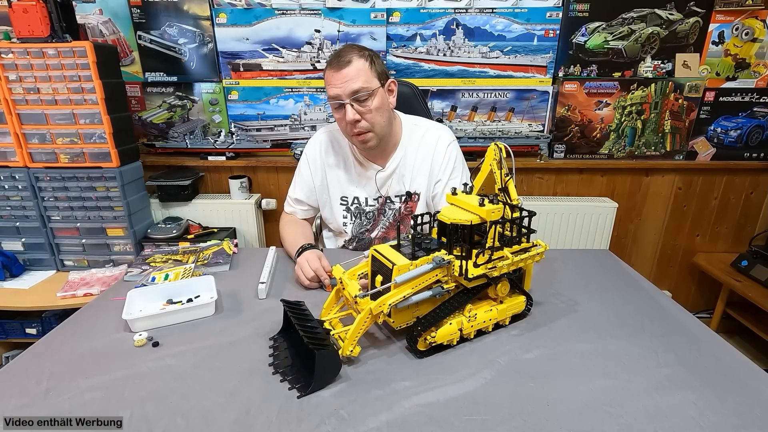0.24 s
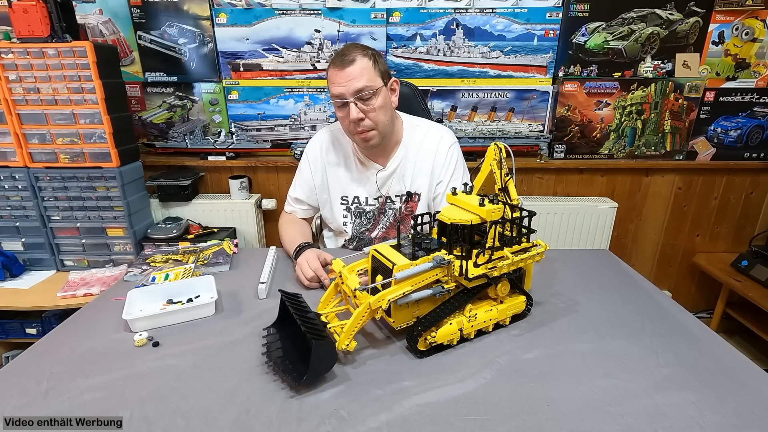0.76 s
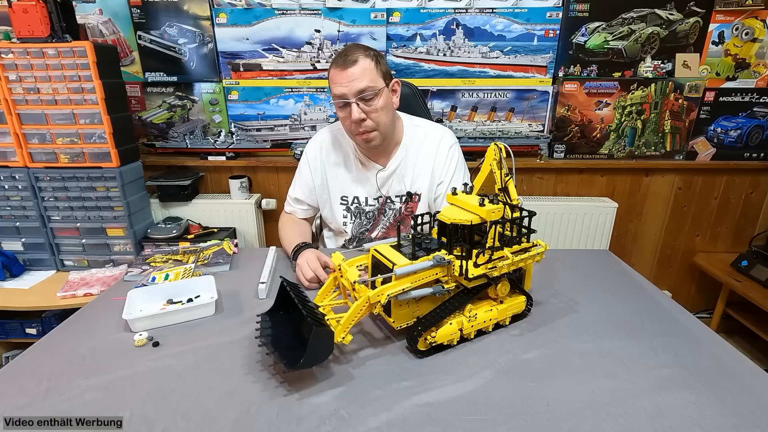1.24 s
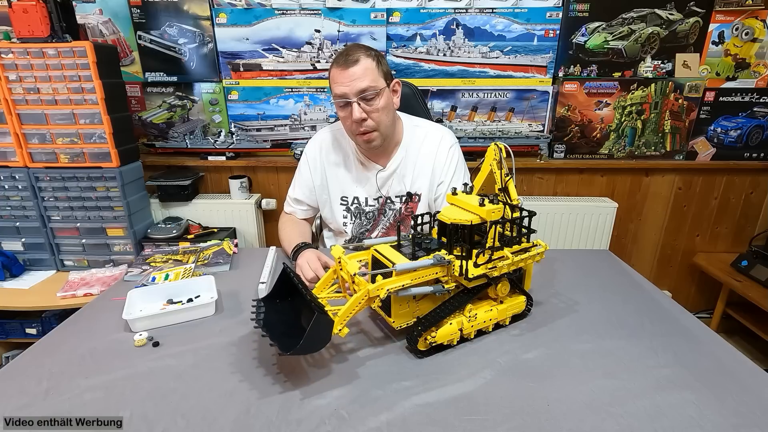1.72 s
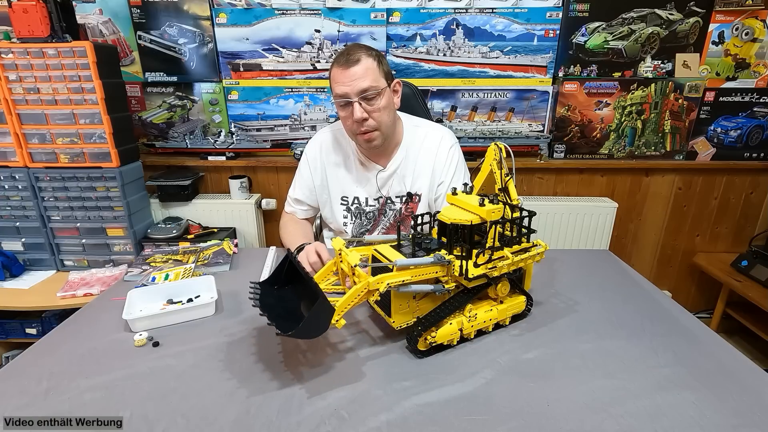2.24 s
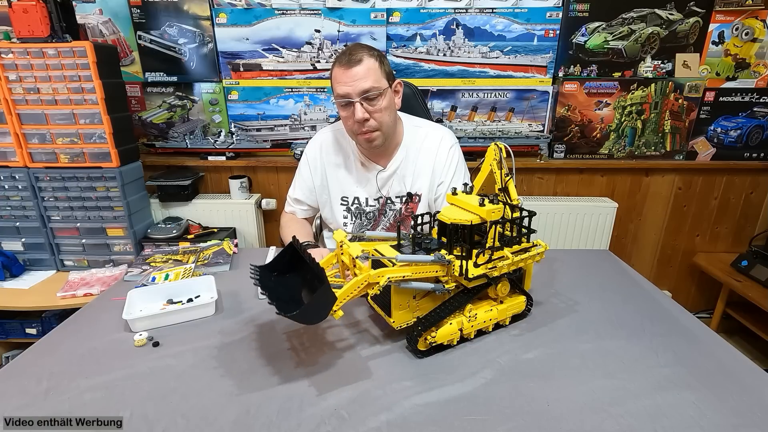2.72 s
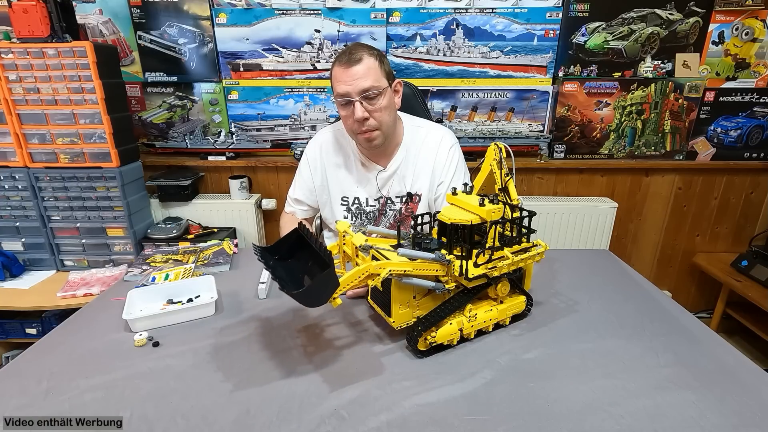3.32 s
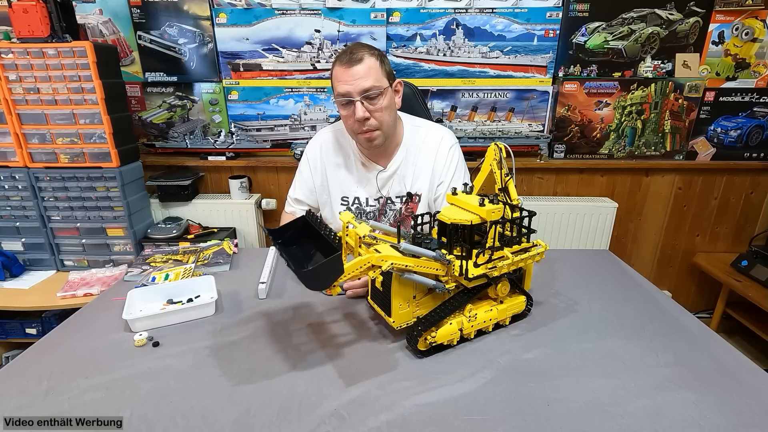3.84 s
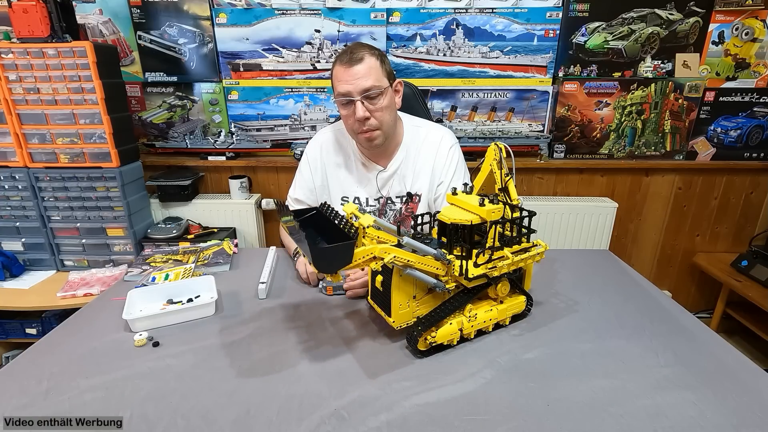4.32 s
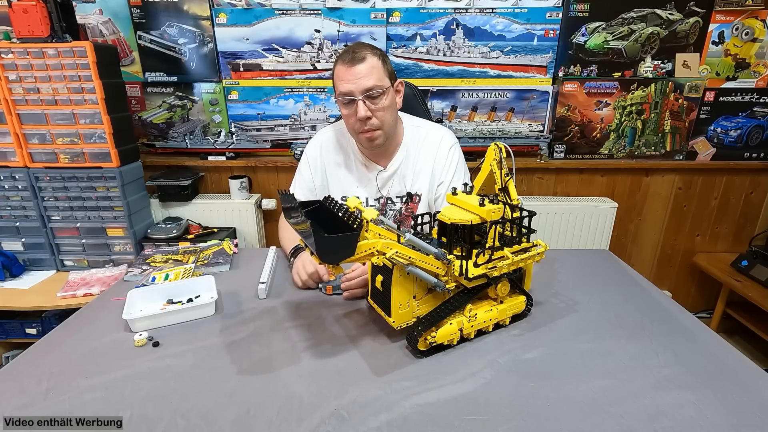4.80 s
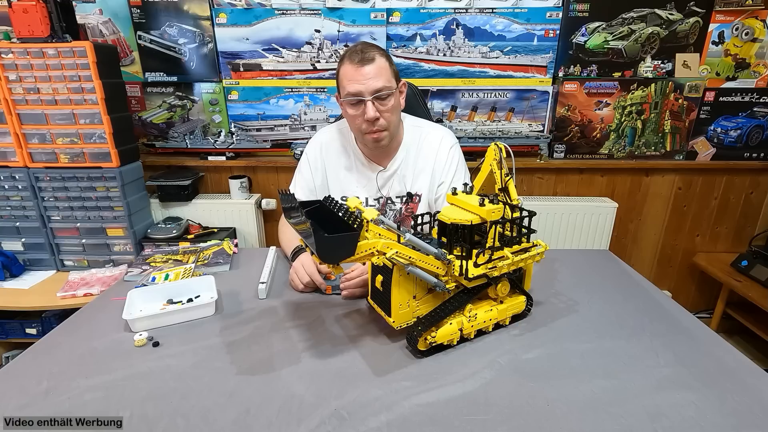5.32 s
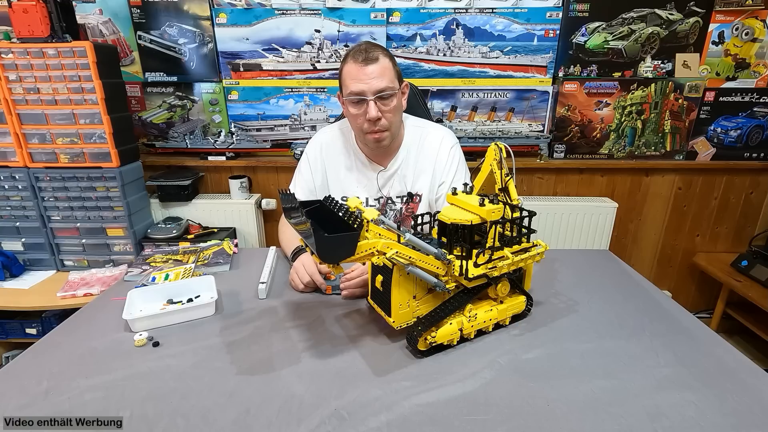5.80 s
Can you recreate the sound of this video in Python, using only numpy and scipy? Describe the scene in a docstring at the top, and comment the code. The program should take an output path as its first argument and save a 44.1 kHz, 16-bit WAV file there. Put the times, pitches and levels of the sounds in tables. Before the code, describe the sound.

Heard close in a small room, a plastic toy bulldozer lifts its bucket with a thin motor whine and whirring gears. Twice the load makes the frame rattle and the gear teeth skip in loud, quick clicks, with softer ticking in between. The gears then rasp until the power cuts. With a sharp clack the motor restarts and hums freely, with one short axle squeak near the end.

```python
"""A plastic toy bulldozer's electric motor buzzes as it lifts the bucket, on a table in a small room.
Brushes scrape inside the motor, gears whirr, and the output gear ticks once a turn.
Twice the gears strain hard, rattle the frame and skip teeth loudly.
The motor runs down, a gear selector clacks over, and the motor spins up again with no load."""
import sys
import numpy as np
from scipy import signal
from scipy.fft import rfft, irfft
from scipy.io import wavfile

SR = 44100
rng = np.random.default_rng(int(sys.argv[2]) if len(sys.argv) > 2 else 0)


def store_pcm(level_fs):
    """Save levels as 16-bit WAV."""
    pcm = np.round(np.clip(level_fs, -1, 1) * 32767).astype(np.int16)
    wavfile.write(sys.argv[1], SR, np.atleast_2d(pcm).T)


N = 267157
TIME = np.arange(N) / SR
CUT_S, RESTART_S = 4.71, 4.96  # the power goes off, then on again

# tone of the plastic frame: (frequency [Hz], level [dB])
FRAME_TONE = [(90, -5), (170, 0.5), (290, 6.5), (520, -2.5), (1000, -2), (1550, 2), (2400, -3.5),
              (3100, -1.5), (4150, -9), (5300, -1), (7000, -1.5), (9500, -11.5), (12500, -12.5),
              (15800, -11.5)]
# tone of the shaken tabletop: (frequency [Hz], level [dB])
TABLETOP_TONE = [(20, -9.5), (42, 1.5), (58, -1), (76, -11), (102, 4.5), (140, 2.5), (195, -16), (400, -11),
                 (1000, -66.5)]


def amp(db):
    """Turns decibels into a gain."""
    return 10 ** (np.asarray(db) / 20)


def unit(x):
    """Scales a signal to an average (rms) size of 1."""
    return x / np.sqrt(np.mean(x ** 2) + 1e-20)


def read(points, hz):
    """Reads a curve between its points on a log-frequency axis."""
    f, value = np.transpose(points)
    return np.interp(np.log(hz + 1), np.log(f + 1), value)


def add(mix, s, sound):
    """Mixes a sound in at s seconds."""
    part = mix[max(round(s * SR), 0):][:len(sound)]
    part += sound[:len(part)]


def colour(x, spectrum, peaks=(), size=8192):
    """Filters a sound with a broad tone curve plus narrow peaks or dips."""
    hz = abs(np.fft.fftfreq(size, 1 / SR))
    db = read(spectrum, hz) + sum(d / (1 + (2 * (hz - f) / w) ** 2) for f, w, d in peaks)
    log_gain = np.log(amp(np.maximum(db, -100)))
    response = np.exp(np.conj(signal.hilbert(log_gain)))  # rings only after a hit
    ring = np.fft.ifft(response).real[:size // 2]
    return signal.oaconvolve(x, ring / np.linalg.norm(ring))[:N]


def wander(hz):
    """Random drift, mostly slower than hz."""
    rolloff = 1 + (np.fft.rfftfreq(N, 1 / SR) / hz) ** 4
    return unit(irfft(rfft(rng.standard_normal(N)) / rolloff, N))


def grit(spread_db):
    """Noise like tiny hits of uneven size."""
    return unit(rng.standard_normal(N) * amp(spread_db * wander(2240)))


def each_turn(turns, size=2048, count=130, order=16):
    """A rough surface comes round on every turn and makes a bright buzz."""
    k = np.arange(count)
    surface = irfft(np.exp(2j * np.pi * rng.random(count)) * k ** 2 / (k ** 2 + order ** 2), size)
    return unit(np.interp(turns % 1, np.arange(size) / size, surface, period=1))


def beat(turns, depth):
    """A push that peaks once a cycle."""
    return unit(np.exp(depth * np.cos(2 * np.pi * turns)))


def spells(rows, rise_s, fall_s):
    """Gain over time: each (start [s], end [s], level [dB]) row rises, holds and dies away."""
    return sum(amp(db) * np.clip((TIME - start) / rise_s, 0, 1)
               * np.exp(-np.maximum(TIME - end, 0) / fall_s) for start, end, db in rows)


def spin(coast_s=.25, spin_up_s=.125):
    """Share of full speed: it falls ever faster after the cut and swings back up at the restart."""
    coast = 1 - np.clip((TIME - CUT_S) / coast_s, 0, 1) ** 1.35
    restart = np.sin(np.pi / 2 * np.clip((TIME - RESTART_S) / spin_up_s, 0, 1))
    return np.maximum(coast, restart)


def motor_gain():
    """The motor is quieter the slower it turns."""
    # loudness at full speed: (time [s], level [dB])
    levels = [(0, -49.5), (.55, -49), (.75, -58.5), (2.5, -56.5), (2.7, -52.5), (3.85, -53.5), (4.0, -50.5),
              (6.06, -50)]
    return amp(np.interp(TIME, *np.transpose(levels))) * spin() ** 1.55


def motor(turns, db=13, hiss_db=-2):
    """Brushes scrape the same spinning contacts on every turn, and the bearings add a duller hiss."""
    # tone of the motor: (frequency [Hz], level [dB])
    tone = [(40, 1), (80, -3), (150, 2.5), (420, -4), (800, -1.5), (1150, -6), (1600, 0), (2400, -6),
            (3200, -3.5), (4050, -11.5), (4600, -2.5), (7200, -2), (8900, -2), (11200, 0), (11900, -12),
            (14500, -8), (15800, -7)]
    # its case rings: (frequency [Hz], width [Hz], boost [dB])
    case = [(4820, 120, 3), (7900, 95, 10), (8260, 180, 11.5), (10300, 350, 2.5)]
    hiss = signal.lfilter(*signal.butter(1, 5000, fs=SR), grit(0.89))
    scrape = each_turn(turns) + amp(hiss_db) * unit(hiss)
    scrape = unit(scrape * beat(3 * turns, 0.45) * beat(2 * turns, 0.034))
    return amp(db) * motor_gain() * colour(scrape, tone, case)


def whine(turns, flutter_db=3, waver=0.94, worn_db=-0.5):
    """Meeting teeth make thin tones; a worn gear wavers, and one gear runs on as the motor coasts."""
    # gear tones: (pitch [times motor speed], level [dB])
    pitches = [(9, -6), (10, -7), (17.66, -12), (35, -9), (43, -7), (44, -4), (46, -5), (47, -5), (59, -8)]
    tones = sum(amp(db + flutter_db * wander(25)) * np.sin(2 * np.pi * k * turns) for k, db in pitches)
    worn = np.sin(2 * np.pi * 26.25 * turns + waver * wander(60)) * amp(flutter_db * wander(32))
    worn *= amp(worn_db) * spin() ** 7.3  # sings only near full speed
    overrun = np.sin(2 * np.pi * 33 * turns + waver * wander(60))
    coasting = spells([(CUT_S, CUT_S + 0.052, -45)], rise_s=.03, fall_s=0.026)
    return motor_gain() * (tones + worn) + coasting * overrun


def hum(turns, pulse_hz=2017):
    """The off-balance rotor hums, and the speed controller's pulses make the coils sing."""
    # hum at one, two and three times the motor speed: (level [dB])
    levels = [-55, -50.5, -60]
    # the motor runs free: (start [s], end [s], level [dB])
    free_runs = [(0, .2, -16), (5.02, 6.06, 0)]
    # the coils sing at part power: (start [s], end [s], level [dB])
    singing = [(3.92, 4.72, -52), (4.923, 4.94, -42), (4.952, 4.964, -44)]
    rotor = sum(amp(db) * np.sin(2 * np.pi * k * turns) for k, db in enumerate(levels, 1))
    rotor *= spells(free_runs, rise_s=.05, fall_s=.05)
    phase = 2 * np.pi * pulse_hz * TIME
    coils = np.sin(phase) + amp(-37) * np.sin(2 * phase)
    coils *= spells(singing, rise_s=.003, fall_s=0.005)
    return np.sqrt(2) * (rotor + coils)


def room_tone(db=-54):
    """The still room's faint rumble and hiss."""
    # tone of the room: (frequency [Hz], level [dB])
    tone = [(20, -29), (60, -21), (150, -7), (400, -3), (2000, -8.5), (9000, -12.5), (16000, -23)]
    return amp(db) * colour(rng.standard_normal(N), tone)


def gears(turns, db=5.5, table_db=-8):
    """Rubbing gear teeth whirr and shake the table."""
    # tone of the gears: (frequency [Hz], level [dB])
    tone = [(200, -6), (480, -10.5), (750, -4.5), (1200, -9.5), (1700, 0.5), (2200, -7.5), (3000, -11),
            (4200, -17.5), (5100, -6), (5700, -14.5), (6500, 3), (7400, -13), (9000, -21), (9800, -8),
            (10900, -33), (12100, -17.5), (15800, -19)]
    # their case rings: (frequency [Hz], width [Hz], boost [dB])
    case = [(1726, 134, 5.7), (6730, 180, 4.15), (5960, 250, 4.8)]
    # the gears are engaged: (start [s], end [s], level [dB])
    engaged = [(.22, 4.64, -41)]
    cycles = turns * 2 / 3  # the pattern repeats twice in three motor turns
    force = unit(beat(3 * cycles, .35) * beat(4 * cycles + .25, .3))
    rub = unit(.5 * each_turn(cycles) + grit(0.68)) * force * amp(0.77 * wander(15))
    whirr = amp(db) * colour(rub, tone, case)
    rumble = amp(table_db) * colour(grit(8), TABLETOP_TONE)
    return spells(engaged, rise_s=0.066, fall_s=0.1) * (whirr + rumble)


def struck(blows, notes, tick_db):
    """Each blow gives a short tick and rings a plastic part's own notes."""
    t, out = np.arange(SR // 6) / SR, np.zeros(N)
    for s, blow_db in blows:
        ring = sum(amp(db - 60 * t / fade_s) * np.sin(2 * np.pi * (hz * t + rng.random()))
                   for hz, db, fade_s in notes)
        tick = amp(tick_db) * rng.standard_normal(len(t)) * np.exp(-t / 0.0012)
        add(out, s, amp(blow_db) * (ring + tick) * (1 - np.exp(-t / 0.00026)))
    return out


def arm_knocks():
    """The arm knocks as it takes up its slack."""
    # knocks: (time [s], level [dB])
    blows = [(.231, -23), (.3078, -11), (.469, -14.5), (4.864, -32)]
    # the arm rings: (frequency [Hz], level [dB], time to fade 60 dB [s])
    notes = [(940, -2, 0.017), (1200, -4.5, 0.01), (1400, 3, 0.011), (1900, -14, 0.02),
             (3150, -11.5, 0.014), (5500, -5, 0.0069)]
    return struck(blows, notes, tick_db=-9)


def strain(turns, rattle_db=7, rasp_db=5.0, table_db=-2):
    """Under load the loose frame rattles and the motor's small gear rasps once a turn."""
    # tone of the small gear: (frequency [Hz], level [dB])
    tone = [(3000, -11), (6000, 0.5), (7500, 6), (8300, 17), (9200, 7), (15000, -38)]
    # its case rings: (frequency [Hz], width [Hz], boost [dB])
    case = [(8250, 360, 2.2), (6300, 270, 3.7), (10400, 520, 9.3)]
    # strain, hardest at both ends of the lift: (start [s], end [s], level [dB])
    loads = [(.24, .56, -45), (.65, 2.5, -56.5), (2.54, 3.74, -44.5)]
    # the rasp goes on while the bucket tilts: (start [s], end [s], level [dB])
    tilts = [(3.88, 4.71, -47)]
    rattle = colour(grit(3.2) * amp(2 * wander(90)), FRAME_TONE)
    teeth = unit(.7 * each_turn(turns) + grit(2)) * beat(turns, .55)
    rasp = colour(teeth, tone, case)
    rumble = colour(grit(1.3), TABLETOP_TONE)
    load = spells(loads, rise_s=0.11, fall_s=0.079)
    tilt = spells(tilts, rise_s=.08, fall_s=.04)
    return load * (amp(rattle_db) * rattle + amp(rasp_db) * rasp + amp(table_db) * rumble) + tilt * rasp


def tooth_snaps(tick_rows, db=2, rise_s=0.0011, snap_s=0.003, chatter_s=0.024):
    """Each skipping tooth or tick is a burst of tiny hits that rings the frame and trails into chatter."""
    # teeth catch and skip: (time [s], level [dB], treble [dB])
    skips = [(0.397, -12, -3), (0.507, -18, -6), (0.609, -11, -4), (0.708, -13.5, -6), (2.688, -10, -4.5),
             (2.781, -14.5, -0.5), (2.898, -9.5, -0.5), (2.987, -17, -4), (3.102, -12.5, -3),
             (3.215, -21.5, -2), (3.314, -11, 0), (3.427, -12.5, -19), (3.525, -9, -3.5), (3.639, -9, -1),
             (5.073, -32, 5)]
    # a tooth rings: (frequency [Hz], width [Hz], boost [dB])
    ringing = [(1560, 120, 3.5), (2740, 100, 2), (5270, 210, 5)]
    t, blows = np.arange(SR // 10) / SR, np.zeros(N)
    rise = (1 - np.exp(-t / rise_s)) ** 2
    fall = np.exp(-t / snap_s) + amp(-15) * np.exp(-t / chatter_s)
    for s, level_db, treble_db in skips + tick_rows:
        burst = rng.standard_normal(len(t)) * rise * fall
        dull = signal.lfilter(*signal.butter(1, 3500, fs=SR), burst)
        add(blows, s, amp(level_db) * (dull + amp(treble_db) * (burst - dull)))
    tooth = colour(blows, [(400, -4), (1400, 0)], ringing)  # so small a part gives little bass
    return amp(db) * colour(tooth, FRAME_TONE)


def ticks(turns, start_s=.821, end_s=3.8, turns_per_tick=18, loose_per_s=7):
    """Lists the output gear's ticks and loose parts' clicks: (time [s], level [dB], treble [dB])."""
    first, last = np.interp([start_s, end_s], TIME, turns)
    times = np.interp(np.arange(first, last, turns_per_tick), turns, TIME)
    regular = [(s, -23 + 1.7 * rng.standard_normal(), -5) for s in times]
    strays = rng.uniform(start_s, end_s, int(loose_per_s * (end_s - start_s)))
    return regular + [(s, -32.5, 2.5) for s in strays]


def axle_squeaks(overtone_db=-12):
    """Dry axles stick and slip in short falling whistles; the lower ones carry an overtone."""
    # squeaks: (time [s], length [s], start pitch [Hz], end pitch [Hz], level [dB])
    squeaks = [(4.8235, 0.0022, 12000, 11400, -33), (4.851, 0.0022, 11400, 11100, -25.5),
               (5.731, 0.032, 4950, 4570, -30), (5.760, 0.025, 4720, 4500, -36)]
    out = np.zeros(N)
    for s, length, start_hz, end_hz, db in squeaks:
        hz = np.linspace(start_hz, end_hz, int(length * SR))
        hz *= 1 + 0.054 * rng.standard_normal(len(hz))
        phase = 2 * np.pi * np.cumsum(hz) / SR
        overtone = amp(overtone_db) * np.sin(3 * phase) * (3 * start_hz < SR / 2)
        add(out, s, amp(db) * (np.sin(phase) + overtone) * signal.windows.tukey(len(hz), .5))
    return out


def selector_clack():
    """The gear selector snaps over and bounces."""
    # the hit and its bounces: (time [s], level [dB])
    blows = [(4.9632, -22.5), (4.9658, -28.5), (4.9690, -32), (4.9718, -43)]
    # the selector rings: (frequency [Hz], level [dB], time to fade 60 dB [s])
    notes = [(111, -8.5, 0.049), (205, -13, 0.067), (810, 0.5, 0.043), (940, -1, 0.042), (1250, -3, 0.021),
             (1500, 2, 0.018), (1910, 4, .025), (2356, -10, 0.047), (2744, 8, 0.01), (3590, -8, 0.057),
             (5310, -2, 0.015), (5900, -2, .014), (8620, 1, 0.011)]
    return struck(blows, notes, tick_db=5.0)


def room(x, echo_db=-13):
    """The room adds a short tail of echoes, and a bounce off the table cancels some treble."""
    # echo length: (frequency [Hz], time to fade 60 dB [s])
    fades = [(150, 0.15), (1000, 0.24), (5000, 0.11), (15000, 0.22)]
    # cancelled bands: (frequency [Hz], width [Hz], level [dB])
    dips = [(10950, 180, -7.5), (14200, 450, -5.5)]
    size = SR // 2
    echoes = rng.standard_normal(size) * (rng.random(size) < .06) * (np.arange(size) > .004 * SR)
    hz, t, bands = signal.stft(echoes, SR, nperseg=256)
    tail = signal.istft(bands * amp(-60 * t / read(fades, hz)[:, None]), SR)[1]
    reverb = signal.fftconvolve(x, tail / np.linalg.norm(tail))[:N]
    return colour(x + amp(echo_db) * reverb, [(0, 0)], dips)


def scene():
    """One motor shaft drives the running sounds; both channels carry the same mix."""
    # speed under power, sagging with the load: (time [s], speed [turns a second])
    speeds = [(0.2, 181.5), (0.5, 168.7), (0.76, 178.6), (1.06, 173), (1.16, 180), (1.62, 170.3),
              (2.26, 174.3), (2.85, 167.8), (3.42, 170.8), (3.86, 166.5), (3.96, 172), (4.55, 167.3),
              (4.7, 170), (5.1, 183.4), (5.2, 180.4), (5.42, 178.4), (5.58, 180.7), (6.02, 179.7)]
    speed = np.interp(TIME, *np.transpose(speeds)) * spin() * (1 + .002 * wander(20))
    turns = np.cumsum(speed) / SR
    running = motor(turns) + whine(turns) + hum(turns) + gears(turns) + strain(turns)
    brief = arm_knocks() + tooth_snaps(ticks(turns)) + axle_squeaks() + selector_clack()
    mono = room(running + brief) + room_tone()
    return np.array([mono, mono])


def record(dry, cutoff_hz=15780):
    """Removes the very highest treble."""
    lowpass = signal.firwin(511, cutoff_hz, window=("kaiser", 9), fs=SR)
    return signal.oaconvolve(dry, lowpass[None], "same")


dry = scene()
out = record(dry)
store_pcm(out)
```